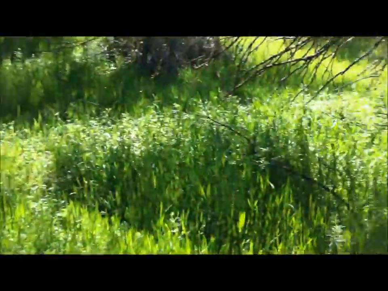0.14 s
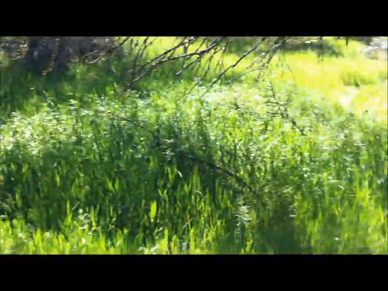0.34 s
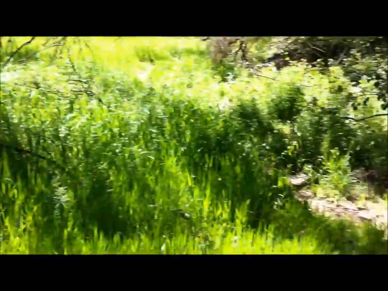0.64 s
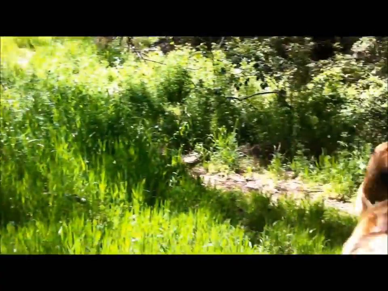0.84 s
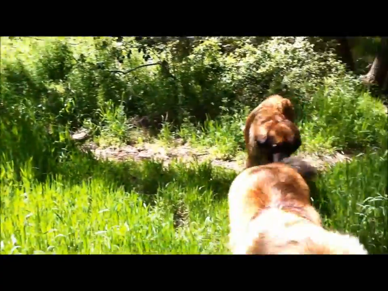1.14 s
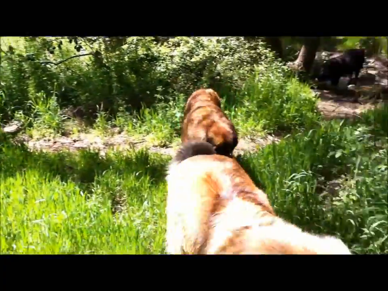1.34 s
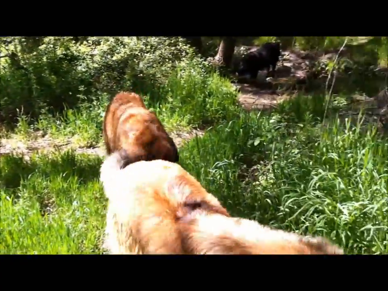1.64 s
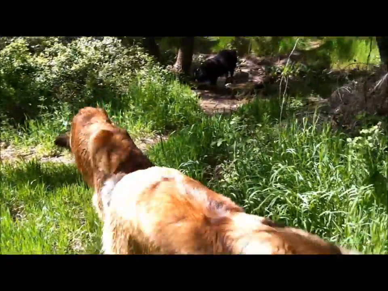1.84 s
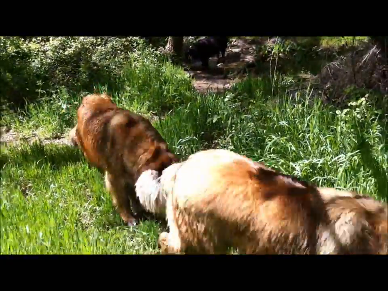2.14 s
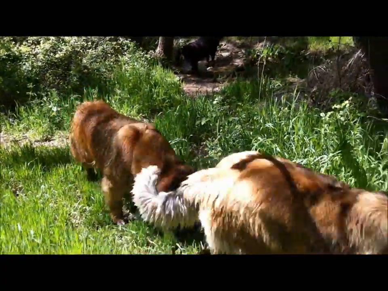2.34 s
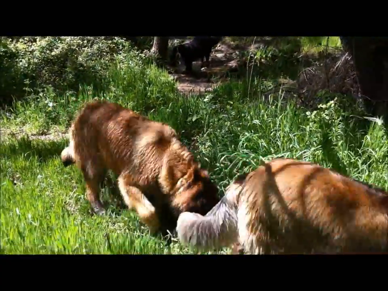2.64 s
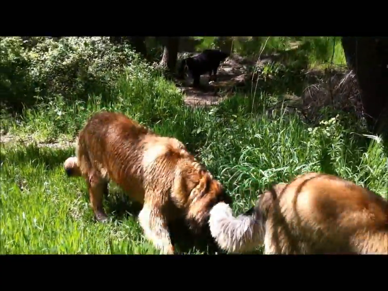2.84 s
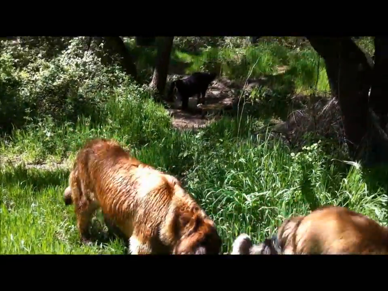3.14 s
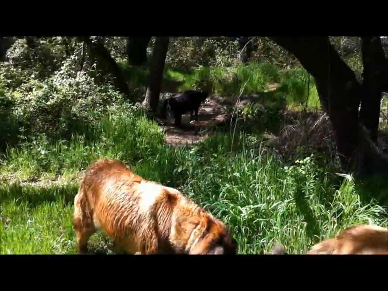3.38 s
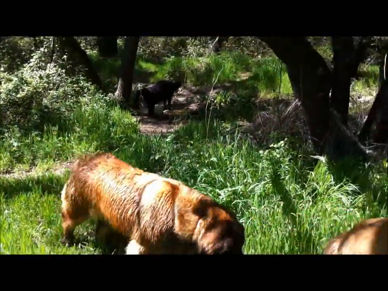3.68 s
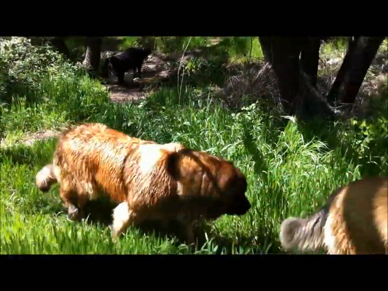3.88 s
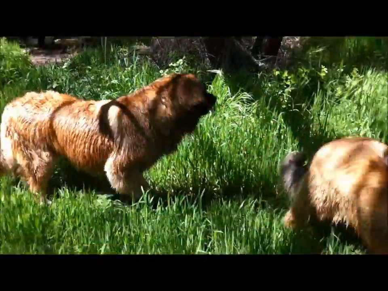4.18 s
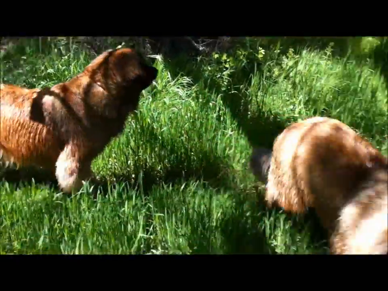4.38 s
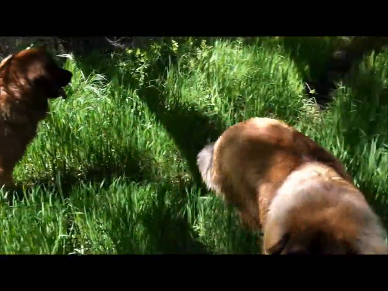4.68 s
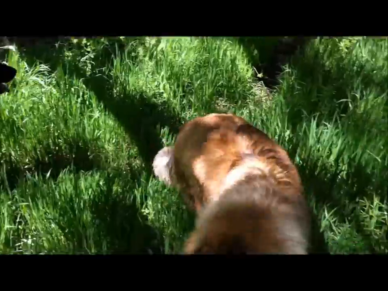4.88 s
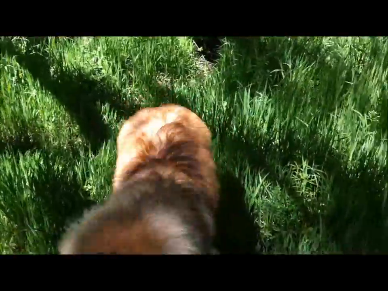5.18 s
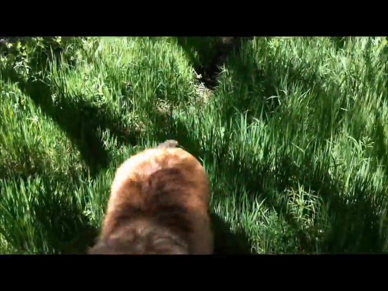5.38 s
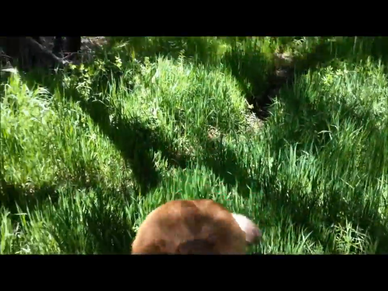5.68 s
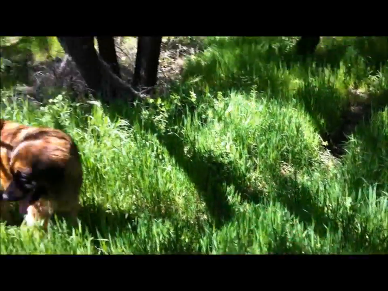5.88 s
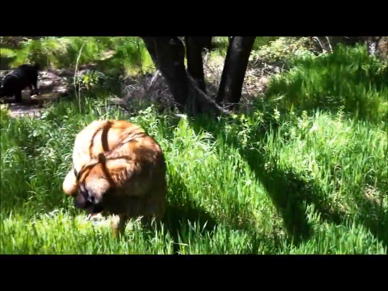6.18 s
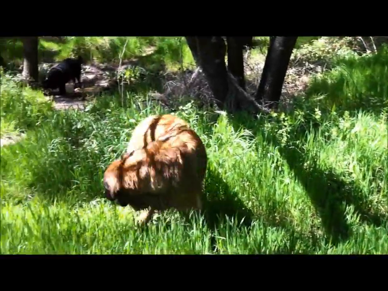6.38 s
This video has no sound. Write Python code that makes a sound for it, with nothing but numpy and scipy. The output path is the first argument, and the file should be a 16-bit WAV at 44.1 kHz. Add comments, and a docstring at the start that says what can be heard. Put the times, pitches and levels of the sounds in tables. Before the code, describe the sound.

Dogs pant and rustle through long grass as birds whistle and trill; halfway, one big dog snorts once, loud, close and fluttering.

```python
"""Panting dogs brush through long grass, stems snap, and birds whistle and trill among trees.
Halfway, a large dog snorts once close by: a blast of air makes the soft palate flap, ever slower.
A second trill crosses it; panting, snaps and grass go on, with a few soft footfalls.
Flaps are puffs ringing a resonance, breaths are filtered noise, stems are damped rings,
grass is noise with clicks in it, and birds are gliding near-sines convolved with a decaying echo."""
import sys
import numpy as np
from scipy import signal
from scipy.fft import rfft, irfft
from scipy.io import wavfile
from scipy.ndimage import uniform_filter1d

SR = 44100
rng = np.random.default_rng(int(sys.argv[2]) if len(sys.argv) > 2 else 0)


def pcm_store(signal):
    """Save signal as 16-bit PCM."""
    levels = np.round(np.clip(np.atleast_2d(signal), -1, 1) * 32767)
    wavfile.write(sys.argv[1], SR, levels.astype(np.int16).T)


N = 287532  # samples


def gain_of(db):
    """Logarithmic level: 20 dB is a factor of ten in amplitude."""
    return 10 ** (np.asarray(db) / 20)


def evened(x):
    """Root mean square: scales the signal to rms 1."""
    return x / np.sqrt(np.mean(x ** 2) + 1e-20)


def coloured(x, points):
    """Spectral shaping: weights x by the tabled spectrum, near silent beyond its ends, at rms 1."""
    f, db = np.transpose(points)
    hz = np.fft.rfftfreq(len(x), 1 / SR)
    gain = gain_of(np.interp(np.log(hz + 1), np.log(f + 1), db, -100, -100))
    return evened(irfft(rfft(x) * gain, len(x)))


def resonate(x, hz, width):
    """Resonance: a pair of poles near the unit circle, of gain about 1 at the centre."""
    r = np.exp(-np.pi * width / SR)
    return signal.lfilter([1 - r, 0, r - 1], [1, -2 * r * np.cos(2 * np.pi * hz / SR), r * r], x)


def bell(s, length, order=2):
    """Smooth envelope: a swell and fade around s; a higher order has a flatter top."""
    t = np.arange(N) / SR
    return np.exp(-.5 * np.minimum(abs((t - s) / length) ** order, 100))


def add(mix, s, sound):
    """Superposition: adds a sound in at s seconds; what lies before zero is cut."""
    at = round(s * SR)
    sound = sound[max(-at, 0):]
    part = mix[max(at, 0):][:len(sound)]
    part += sound[:len(part)]


def grit(per_s, spread_db, share):
    """Random impulses: sparse clicks of uneven size modulate a steady noise."""
    sizes = gain_of(spread_db * np.minimum(rng.exponential(1, N), 5))
    clicks = sizes * (rng.random(N) < per_s / SR)
    roughness = evened(uniform_filter1d(clicks, size=40))
    return evened(rng.standard_normal(N) * (1 + share * roughness))


# course of the snort: t/s, effort/dB, nose ring f/Hz, boom of chest and windpipe over the effort/dB
SNORT_COURSE = [(3.349, -56, 267, 11), (3.37, -13, 270, -12.5), (3.389, -13, 265, -9.5),
                (3.42, -8.5, 380, -18.5), (3.44, -8, 310, -16), (3.452, -19.5, 302, -11.5),
                (3.465, -10.5, 300, -21), (3.484, -18, 220, -18), (3.502, -20, 250, -28),
                (3.527, -42, 190, -6.5), (3.54, -39, 200, -18), (3.57, -49.5, 129, -3),
                (3.585, -70, 125, -4)]
# turbulent air in the nose: f/Hz, relative density/dB
RASP_COLOUR = [(80, -22.5), (130, 4), (250, 4.5), (450, -0.5), (600, -8.5), (700, -9), (1000, -19),
               (1300, -30), (2500, -46), (4000, -74)]
# air jet from the nostrils into the grass: t/s, level before the pulsing/dB
JET_COURSE = [(3.31, -68), (3.338, -50), (3.37, -50.5), (3.405, -50), (3.44, -52.5), (3.465, -57),
              (3.51, -71)]
# hiss of that jet: f/Hz, relative density/dB
JET_HISS = [(500, -10), (1450, 6), (2300, -2.5), (4000, -12.5), (7000, -15.5), (11000, -18.5),
            (16000, -19.5)]
FLAP_S, FLAP_PER_GAP = .0028, .09  # puff length: a fixed part, plus a share of the gap
RASP_DB, REBOUND_RASP_DB = 5.5, -1.5  # rasp against the ring at full effort: first puff, duller second
RASP_PER_DB = 0.66  # further dB of rasp lost against the ring for each dB of effort lost
REBOUND_AT = 0.42  # second puff, as a share of the gap
BOOM_HZ, BOOM_SAG_HZ_PER_S = 171.8, 240  # the boom sinks through the snort


def snort():
    """Pulsed airflow exciting a resonance: puffs ring the nose and rasp, over a boom and a jet."""
    t = np.arange(N) / SR
    at, effort_db, ring_hz, boom_db = np.transpose(SNORT_COURSE)
    rasp = coloured(rng.standard_normal(N), RASP_COLOUR)
    puffs = np.zeros(N)
    for flap_s, gap in flaps():
        length = FLAP_S + FLAP_PER_GAP * gap
        rebound_s = flap_s + REBOUND_AT * gap
        for s, rasp_db in [(flap_s, RASP_DB), (rebound_s, REBOUND_RASP_DB)]:
            hz = np.interp(s, at, ring_hz)
            fading_db = RASP_PER_DB * (np.interp(s, at, effort_db) - effort_db.max())
            # the pitch sags as the flap shuts
            cycles = hz * (t - s) * (1 - 0.12 * (t - s) / length) + rng.random()
            puffs += bell(s, length) * np.cos(2 * np.pi * cycles)
            puffs += gain_of(rasp_db + fading_db) * bell(s, 0.7 * length) * rasp
    effort = np.interp(t, at, effort_db, -120, -120)
    puffs *= gain_of(effort)

    rumble = evened(resonate(rng.standard_normal(N), 140, 110))
    hz = BOOM_HZ - BOOM_SAG_HZ_PER_S * (np.clip(t, at[0], at[-1]) - at[0])
    boom = np.sqrt(2) * np.sin(2 * np.pi * np.cumsum(hz) / SR) + .6 * rumble
    boom *= gain_of(effort + np.interp(t, at, boom_db))

    pulsing = 1 + 2.0 * uniform_filter1d(abs(puffs), size=200)  # the jet pulses with the flaps
    jet = gain_of(np.interp(t, *np.transpose(JET_COURSE), -120, -120))
    jet = jet * pulsing * coloured(rng.standard_normal(N), JET_HISS)
    return puffs + boom + jet


FIRST_FLAP_S, TAUT_GAP_S, SLACK_GAP_S = 3.363, .0183, .047
TAUT_FLAPS, SLACK_FLAPS = 4, 5
SLACKEN = 0.339  # share of the remaining way to the slack gap that each later gap goes


def flaps():
    """Relaxation oscillation: even gaps at first, then ever longer; gives each flap time and gap."""
    steps = np.maximum(np.arange(TAUT_FLAPS + SLACK_FLAPS) - TAUT_FLAPS + 1, 0)
    slack = 1 - (1 - SLACKEN) ** steps
    gaps = TAUT_GAP_S + (SLACK_GAP_S - TAUT_GAP_S) * slack
    return zip(FIRST_FLAP_S + np.cumsum(gaps) - gaps, gaps)


# panted breaths: middle t/s, level/dB, bell length t/s, tongue resonance f/Hz, its relative level/dB
BREATHS = [(0.135, -66, 0.046, 613, 11), (.416, -50.5, 0.033, 1180, -27), (0.758, -51, 0.019, 1230, -1),
           (0.803, -45.5, 0.018, 1200, -11), (0.906, -66, 0.029, 720, 8.5), (1.171, -47, 0.025, 1220, -3),
           (1.277, -66.5, 0.025, 746, 9.5), (1.543, -72.5, 0.06, 795, 14), (1.84, -67.5, 0.048, 740, 7),
           (2.588, -67.5, .015, 865, 14.5), (2.794, -64, 0.017, 940, 6.5),
           (4.072, -74.5, 0.029, 1070, 12.5), (4.303, -66.5, 0.026, 1070, 5.5), (4.44, -67, 0.029, 993, 0),
           (4.587, -60.5, 0.037, 930, 3), (4.716, -62, 0.018, 1490, -6), (4.85, -59.5, 0.02, 1064, -4),
           (4.995, -62.5, 0.041, 1086, -9), (5.091, -67, 0.03, 1860, 0.5), (5.272, -58.5, 0.05, 1106, 3),
           (5.597, -60.5, 0.039, 1100, 2.5), (5.701, -58.5, 0.022, 1030, -8), (5.875, -61, 0.029, 1115, -1),
           (5.994, -63.5, 0.025, 304, -1), (6.132, -64, 0.025, 1161, 0.5)]
# mouth resonances, two lower then four upper: f/Hz, width of the sharper filter f/Hz, relative level/dB
MOUTH_RESONANCES = [(253, 77, -12.5), (424, 22.8, 0.5), (778, 50, 6), (1120, 126, 5.5), (1450, 530, 6),
                    (1970, 41, -4)]
UPPER_DB = -11.5  # further level of the upper mouth resonances


def panting():
    """Source and filter: breath noise in the mouth resonances; the tongue sets one more per breath."""
    breath, out = grit(150, 2.4, 0.18), np.zeros(N)
    bands = []
    for hz, width, db in MOUTH_RESONANCES:
        band = resonate(resonate(breath, hz, width), hz, 8.4 * width)
        bands.append(gain_of(db) * evened(band))
    mouth = sum(bands[:2]) + gain_of(UPPER_DB) * sum(bands[2:])
    for s, db, length, tongue_hz, tongue_db in BREATHS:
        tongue = resonate(breath, tongue_hz, 0.18 * tongue_hz)
        tongue = evened(resonate(tongue, tongue_hz, .5 * tongue_hz))
        out += gain_of(db) * bell(s, length, order=3) * (mouth + gain_of(tongue_db) * tongue)
    return out


# stems and twigs snapping: t/s, nominal ring level/dB, ring f/Hz, crack over the ring/dB,
# time for the ring to fall 60 dB t/s
STEM_SNAPS = [(0.875, -34.5, 2240, -12, 0.015), (1.374, -38, 416, -2, 0.015), (1.586, -45, 720, 0.5, 0.04),
              (1.781, -39, 1190, -7, 0.013), (1.803, -31, 679, -17, 0.038), (2.295, -44, 2100, 0, 0.017),
              (2.616, -23.5, 970, -19, 0.005), (2.79, -39, 1140, -7, 0.01), (2.889, -55, 1560, 5, 0.022),
              (2.897, -51, 600, 8.5, 0.0068), (2.941, -41, 1200, -1.5, 0.012),
              (2.967, -19.5, 1040, -44, 0.0023), (2.977, -34, 1150, -16, .005), (3.15, -62, 3500, 5, .005),
              (3.184, -42, 1880, -3.5, 0.026), (3.236, -47, 2200, -10, 0.011),
              (3.966, -43.5, 1700, -18.5, 0.017), (4.041, -29, 720, -6, 0.011),
              (5.366, -64, 3000, 3, 0.0047), (5.851, -44.5, 2020, 0, 0.01), (6.034, -54, 2500, -6, .008),
              (6.268, -41, 3580, -14, 0.0098), (6.235, -40.5, 615, -4.5, 0.024),
              (6.449, -19, 1066, -8, 0.0084), (6.501, -48.5, 6970, -2.5, 0.0045)]
# crack of a stem: f/Hz, relative density/dB
CRACK_COLOUR = [(120, -36), (300, 3), (600, 6.5), (1500, 5), (3000, -7.5), (6000, -8), (12000, -16.5),
                (16000, -30)]


def snaps():
    """Impulse response: a wide crack, then the short damped ring of the stem."""
    out, t = np.zeros(N), np.arange(2000) / SR
    for s, db, hz, crack_db, t60 in STEM_SNAPS:
        onset = np.clip((t - .0002) / 0.003, 0, 1)
        ring = np.sin(2 * np.pi * hz * t) * gain_of(-60 * (t - .0007) / t60) * onset
        crack = coloured(rng.standard_normal(len(t)), CRACK_COLOUR) * gain_of(-60 * t / 0.019)
        add(out, s, gain_of(db) * (ring + gain_of(crack_db) * crack))
    return out


# a leg or flank sweeping through the grass: middle t/s, bell length t/s, swish level/dB, crunch level/dB
GRASS_SWEEPS = [(.11, 0.034, -57.5, -60), (0.244, 0.054, -54.5, -59.5), (.36, 0.033, -55.5, -79),
                (0.863, 0.03, -57.5, -55), (0.967, 0.013, -50, -54.5), (1.263, 0.013, -58, -63),
                (1.369, 0.022, -51, -54.5), (1.477, 0.0093, -50, -59), (1.563, 0.036, -56, -60),
                (1.774, 0.033, -55.5, -68), (1.852, .01, -50.5, -64), (2.065, 0.011, -57, -63),
                (2.184, 0.031, -60, -60.5), (2.275, 0.053, -74, -60.5), (2.463, 0.029, -55.5, -65),
                (3.603, 0.042, -59.5, -80), (3.707, 0.022, -59.5, -60.5), (3.958, 0.013, -56.5, -62.5),
                (4.39, 0.016, -54, -77), (4.512, 0.009, -54.5, -74), (5.093, 0.036, -55.5, -64),
                (5.375, 0.0084, -57, -72), (5.488, .025, -52.5, -60.5), (5.589, 0.042, -52.5, -57.5),
                (5.905, 0.032, -59.5, -63), (6.045, 0.01, -60, -58.5), (6.155, 0.029, -59.5, -63.5),
                (6.45, 0.022, -53, -71)]
# the grass stirring between sweeps: t/s, swish level/dB, crunch level/dB
GRASS_STIR = [(0, -68, -58), (.45, -62.5, -62.5), (.75, -58.5, -58), (1.15, -61.5, -59.5), (1.5, -59, -59),
              (2.1, -59.5, -59.5), (2.7, -59, -61), (3.0, -62.5, -60.5), (3.5, -68, -63), (3.8, -62.5, -65),
              (4.25, -58, -60.5), (4.8, -62.5, -61.5), (5.3, -61, -61.5), (5.701, -60.5, -61.5),
              (6.0, -61.5, -61.5), (6.52, -59.5, -59.5)]
# blades: f/Hz, relative density/dB
SWISH_COLOUR = [(1500, -17.5), (3500, -4), (5500, 5.5), (8000, 4.5), (11000, 4.5), (14000, 4.5), (16000, 5)]
# stems: f/Hz, relative density/dB
CRUNCH_COLOUR = [(90, -19.5), (200, 8), (450, 7), (900, 6), (1500, 5.5), (2500, 1.5), (4500, -7.5)]


def grass():
    """Friction noise: blades swish in the treble, stems crunch lower down; powers add."""
    s, swish_db, crunch_db = np.transpose(GRASS_STIR)
    t = np.arange(N) / SR
    swish = gain_of(np.interp(t, s, swish_db))
    crunch = gain_of(np.interp(t, s, crunch_db))
    for s, length, swish_db, crunch_db in GRASS_SWEEPS:
        sweep = bell(s, length)
        swish = np.hypot(swish, gain_of(swish_db) * sweep)
        crunch = np.hypot(crunch, gain_of(crunch_db) * sweep)
    blades = coloured(grit(60, 2.3, 0.3), SWISH_COLOUR)
    stems = coloured(grit(40, 5.2, 0.24), CRUNCH_COLOUR)
    return swish * blades + crunch * stems


def birds():
    """Frequency modulation and reverberation: gliding near-sines, smeared by echoes off the trees."""
    direct, sent = np.zeros((2, N))
    for s, length, start_hz, middle_hz, end_hz, db, echo_db in songs():
        u = np.linspace(-1, 1, round(length * SR))
        slope, bend = (end_hz - start_hz) / 2, (end_hz + start_hz) / 2 - middle_hz
        hz = middle_hz + u * slope + u ** 2 * bend
        tone = np.sqrt(2) * np.sin(2 * np.pi * np.cumsum(hz) / SR)
        note = gain_of(db) * signal.windows.tukey(len(u), .5) * tone
        add(direct, s, note)
        add(sent, s, gain_of(echo_db) * note)
    # moving leaves and air make the direct notes flutter
    direct *= 1 + 0.37 * evened(uniform_filter1d(rng.standard_normal(N), size=150))
    t = np.arange(SR // 2) / SR
    # the echo falls quickly at first, then ever more slowly
    tail = gain_of(-60 * (t / 0.59) ** 0.78) * np.minimum(t / 0.0023, 1)
    echoes = rng.standard_normal(len(t)) * tail
    return direct + signal.fftconvolve(sent, echoes / np.linalg.norm(echoes))[:N]


# single whistles and chirps: start t/s, length t/s, start f/Hz, middle f/Hz, end f/Hz, level/dB,
# echo over the note/dB (more for a far bird)
SINGLE_NOTES = [(-.03, 0.12, 2820, 2940, 2480, -59.5, -3), (.163, 0.11, 2500, 2700, 2730, -56, 2),
                (.243, 0.1, 2770, 2660, 2470, -55, 1.5), (3.391, 0.01, 3412, 3044, 2862, -38.5, -12),
                (3.462, 0.041, 2770, 2693, 2440, -57, 2), (3.585, 0.021, 3400, 3080, 2700, -39, -6),
                (3.606, 0.025, 2740, 2210, 1870, -52, -8), (3.623, 0.032, 1824, 2300, 2790, -49.5, -13),
                (3.647, 0.072, 2717, 2594, 2520, -60.5, 3), (4.183, 0.01, 4350, 4280, 4130, -54.5, -2.5),
                (4.186, 0.0063, 3010, 3440, 3700, -47, -10), (4.191, 0.027, 3660, 3505, 2730, -47.5, -6),
                (4.214, 0.0134, 2840, 2330, 1940, -62, -15), (4.221, .026, 4560, 3640, 3100, -50.5, -6),
                (4.25, .065, 3630, 3700, 3660, -65.5, -6), (5.86, 0.15, 2250, 2320, 2420, -62.5, -5),
                (6.28, 0.12, 2400, 2500, 2510, -67.5, 2.5), (6.43, 0.086, 2470, 2470, 2530, -70, 7)]
# high whistles, each with a rising pick-up: start t/s, length t/s, start f/Hz, level/dB
HIGH_WHISTLES = [(-.03, 0.093, 7570, -50.5), (0.107, 0.11, 7560, -50.5), (2.533, 0.092, 7500, -47.5),
                 (2.711, 0.073, 7900, -49.5), (2.887, 0.1, 7760, -49.5)]
# two trills of a second bird, note by note: start t/s, level/dB
TRILL_NOTES = [
    [(.272, -48.5), (.337, -46.5), (.408, -45), (.475, -49), (.545, -55), (.61, -54.5), (.677, -50)],
    [(3.048, -53), (3.12, -50.5), (3.185, -48), (3.253, -50), (3.313, -48.5), (3.378, -50), (3.452, -47),
     (3.528, -50.5), (3.615, -54)],
]
# small arched chips: start t/s, level/dB
ARCHED_CHIPS = [(3.706, -63), (3.738, -62), (3.864, -63.5), (3.893, -58), (4.021, -63.5), (4.054, -60.5)]
PICKUP_S, PICKUP_DB = .014, -8  # length; level against its whistle
TRILL_LIFT_HZ, TRILL_SETTLE = 200, 0.18  # lift of the first note; share of it kept from note to note


def songs():
    """Pitch contours: every note as a row with the columns of the single notes."""
    rows = [*SINGLE_NOTES]
    for s, length, hz, db in HIGH_WHISTLES:
        rows.append((s, length, hz, 7390, 7400, db, -2))
        rows.append((s - 1.1 * PICKUP_S, PICKUP_S, 6300, 7000, 7600, db + PICKUP_DB, -12))
    for trill in TRILL_NOTES:
        for k, (s, db) in enumerate(trill):
            lift = TRILL_LIFT_HZ * TRILL_SETTLE ** k
            rows.append((s, .04, 5120 + lift, 5110 + lift, 4650 + lift, db, -3))
    for s, db in ARCHED_CHIPS:
        rows.append((s, .02, 2950, 3600, 2780, db, -7.5))
    return rows


# soft footfalls: middle t/s, level/dB, bell length t/s
FOOTFALLS = [(4.318, -63.5, 0.027), (4.4, -75, 0.022), (4.845, -65, .015)]
# thud in the turf: f/Hz, relative density/dB
THUD_COLOUR = [(35, -5), (70, -8), (130, -7), (250, -21.5)]


def footfalls():
    """Damped impact: soft thuds in the turf, as swells of low noise."""
    steps = sum(gain_of(db) * bell(s, length) for s, db, length in FOOTFALLS)
    return steps * coloured(rng.standard_normal(N), THUD_COLOUR)


# hiss of air and microphone: f/Hz, relative density/dB
AIR_COLOUR = [(30, -6.5), (60, -20), (110, -4.5), (180, 2), (400, -4.5), (1100, -11.5), (2500, -7.5),
              (4000, -7), (5700, -2), (8500, -9.5), (11400, -5), (16000, -10)]
AIR_DB = -64


def air():
    """Stationary noise: the steady hiss of air and microphone."""
    return gain_of(AIR_DB) * coloured(rng.standard_normal(N), AIR_COLOUR)


def scene():
    """Superposition: all sources add as one channel."""
    return (snort() + panting() + snaps() + grass() + birds() + footfalls() + air())[None]


def record(dry):
    """Saturation and band limiting: rounds loud peaks, cuts the deep bass and the top treble."""
    rounded = 0.69 * np.tanh(dry / 0.81)
    thin = signal.sosfilt(signal.butter(3, 85, "highpass", fs=SR, output="sos"), rounded)
    band_limit = signal.firwin(1023, 15780, window=("kaiser", 9), fs=SR)  # cutoff in Hz
    return signal.oaconvolve(thin, band_limit[None], "same")


dry = scene()
out = record(dry)
pcm_store(out)
```